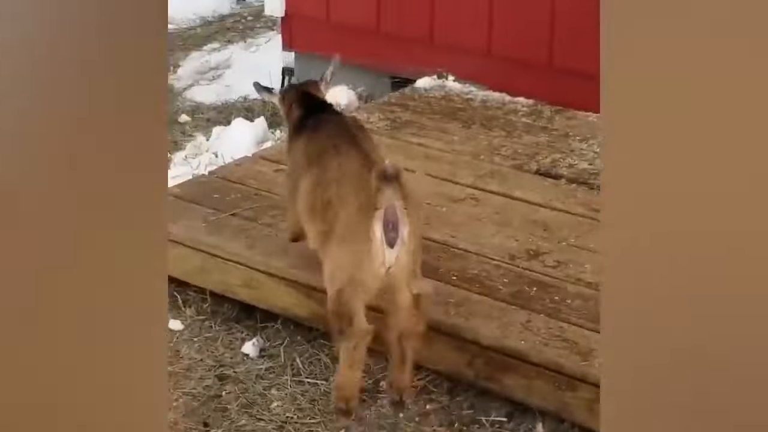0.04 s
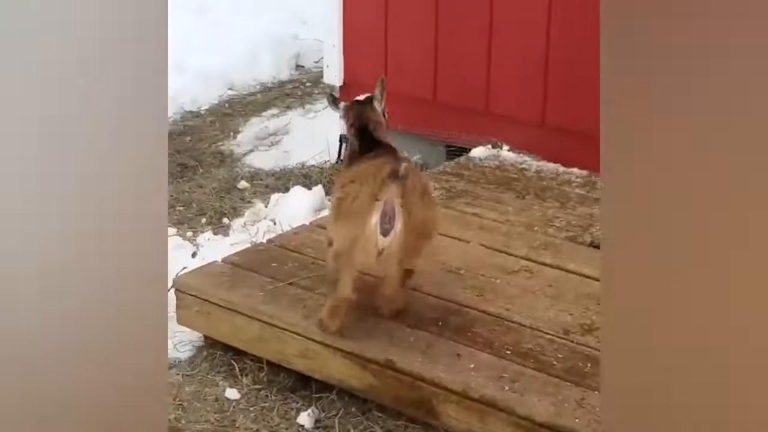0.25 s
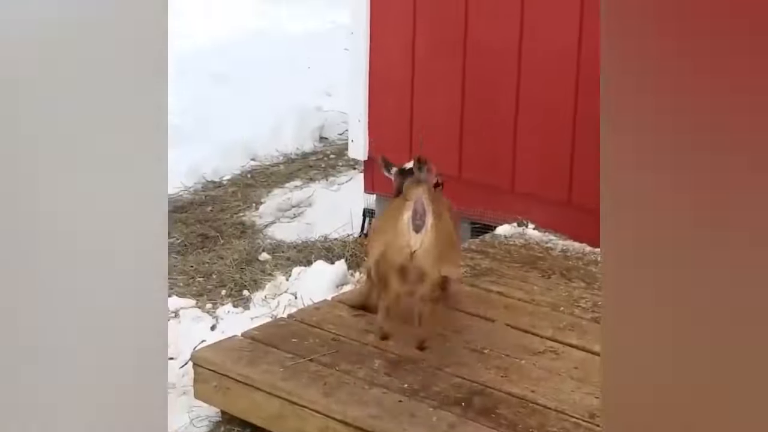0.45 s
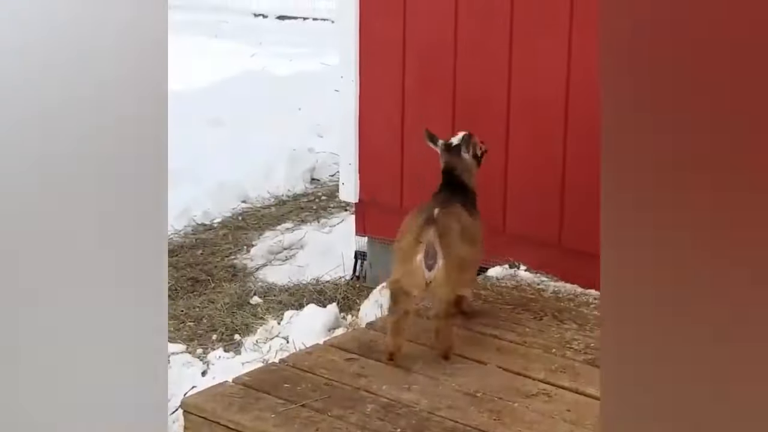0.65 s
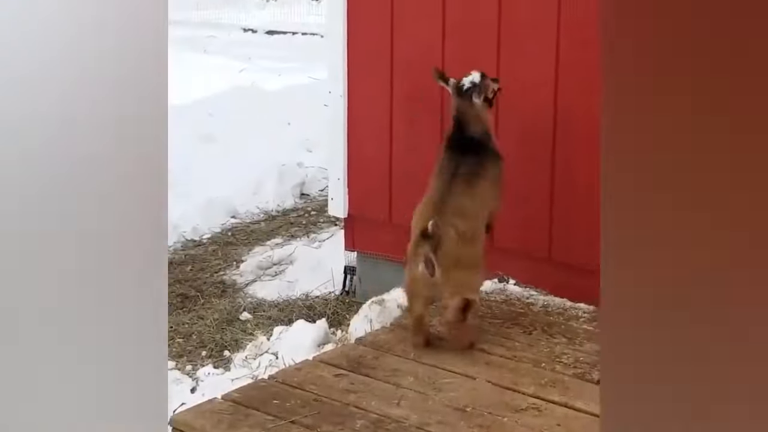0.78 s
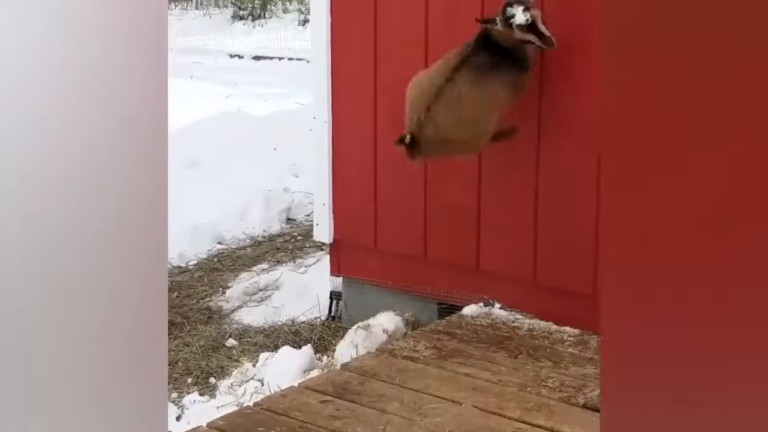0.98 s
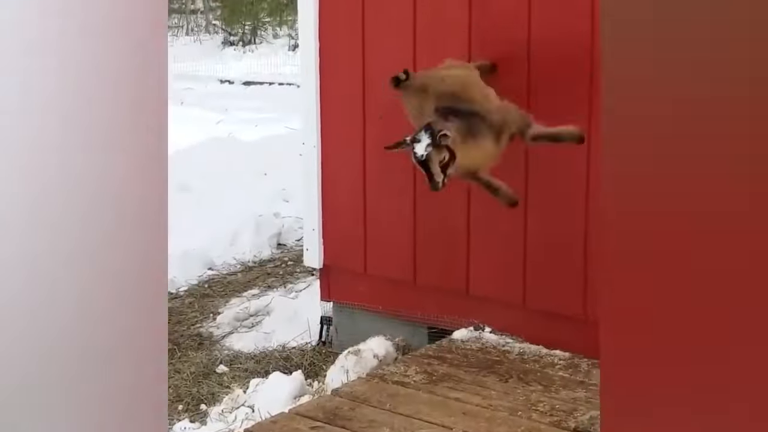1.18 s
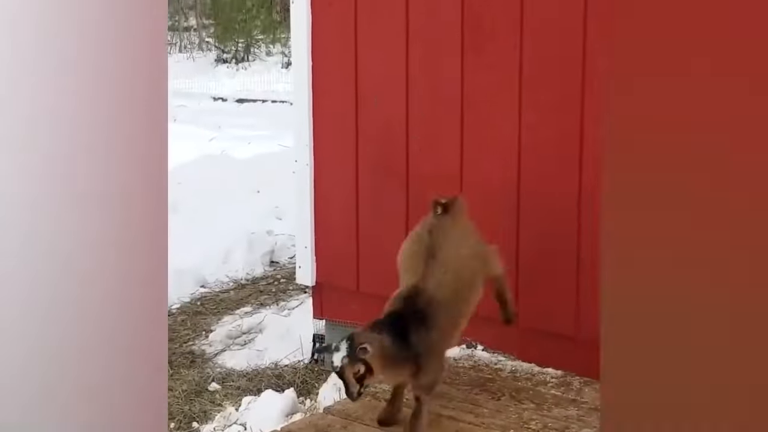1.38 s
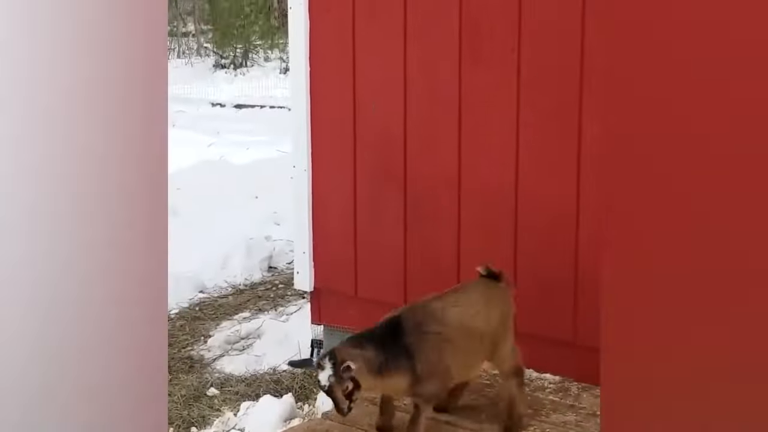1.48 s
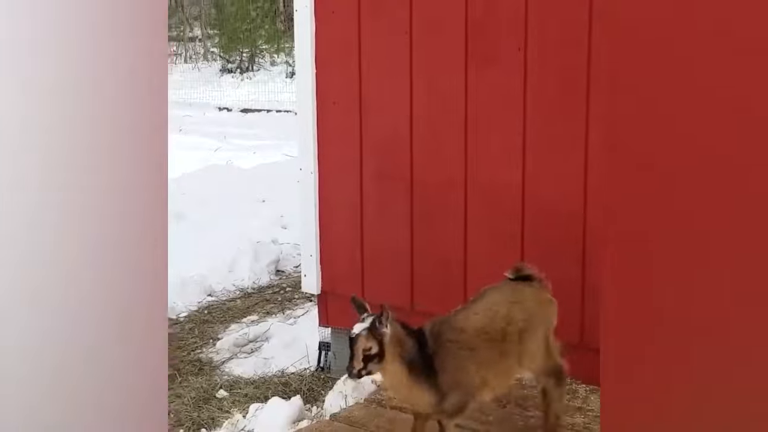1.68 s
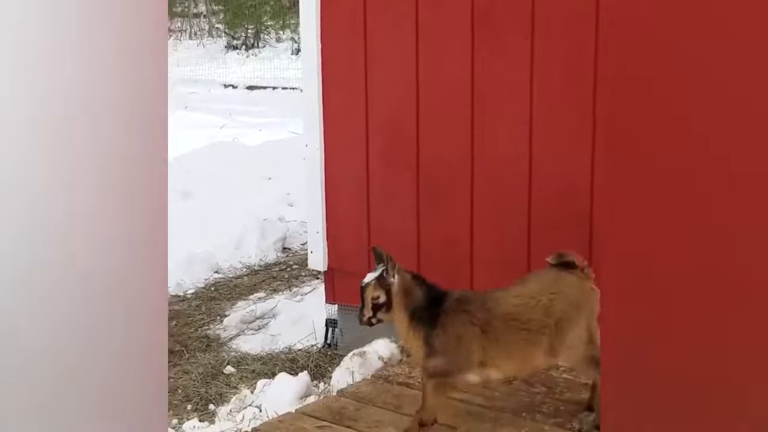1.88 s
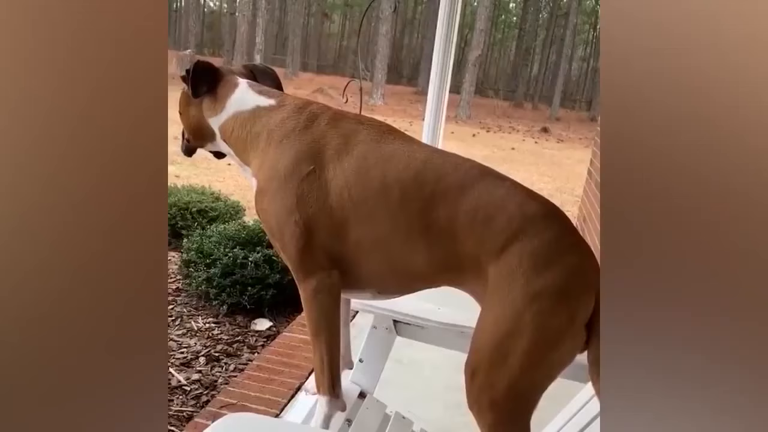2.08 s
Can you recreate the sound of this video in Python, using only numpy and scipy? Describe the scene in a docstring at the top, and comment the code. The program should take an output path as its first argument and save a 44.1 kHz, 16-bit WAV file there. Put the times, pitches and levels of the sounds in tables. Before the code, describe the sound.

Goat kid hooves knock on a wooden deck in quick irregular taps, kick a hollow plank wall with a loud boom and rattle, then land in a hard clatter; close, dry, outdoors with faint hiss.

```python
"""A quiet outdoor hiss, then a goat kid hops onto a wooden deck, kicks off a plank wall and lands again.
The hiss is steady coloured noise; scuffs are trains of tiny grains, and snaps are short noise pulses.
Each hoof layers damped thuds and knocks, noise-band clatter and clack, and the ringing modes of the deck.
The hollow wall is struck the same way but booms for longer, and its loose planks rattle."""
import sys
import numpy as np
from scipy import signal
from scipy.fft import rfft, irfft
from scipy.io import wavfile

SR = 44100
rng = np.random.default_rng(int(sys.argv[2]) if len(sys.argv) > 2 else 0)


def materialize(psi):
    """Save the field psi as 16-bit PCM at rate SR to the path in sys.argv[1].

    A 1-D psi becomes a single channel; in a 2-D psi each row is a channel.
    """
    bounded = np.clip(np.atleast_2d(psi).T, -1, 1)
    quanta = np.round(bounded * 32767).astype(np.int16)
    wavfile.write(sys.argv[1], SR, quanta)


N = 94329  # length in samples

# Outdoor hiss spectrum: (frequency [Hz], relative level per Hz [dB])
AIR_SPECTRUM = [(20, -31.5), (45, -7.5), (90, -4.5), (230, 1), (400, -5.5), (750, -8.5), (1400, -12.5),
                (3000, -14.5), (4400, -9.5), (5600, -25.5), (7000, -23), (8600, -15.5), (11000, -24),
                (13500, -7.5), (16000, -15.5)]
# Spectra of hoof rubbing wood, ground grit and snapping grit: (frequency [Hz], relative level per Hz [dB])
RUB_SPECTRUM = [(25, -46.5), (60, -53), (200, 0), (550, -2.5), (1100, 1), (1700, -13.5), (2600, -16),
                (5000, -32.5), (16000, -50)]
GRIT_SPECTRUM = [(500, -20), (2500, 4), (4200, 8.5), (6000, 2), (8000, 7), (11000, 5), (14000, 12.5),
                 (16000, 11)]
SNAP_SPECTRUM = [(1000, -33), (4000, -13), (7000, -8), (8000, 6.5), (10000, -6), (13000, 7.5), (16000, 1.5)]
# Stereo width of the noise-based sounds: (frequency [Hz], side minus mid [dB])
STEREO_WIDTH = [(100, -15.5), (400, -11.5), (1000, -7), (2200, 0.5), (4500, 0.5), (15000, 1)]
# Scuffs: (time of the peak [s], rise [s], fade [s], rub level [dB], grit level [dB])
SCUFFS = [(0.344, 0.06, 0.068, -50, -58.5), (0.443, 0.021, 0.028, -37.5, -54.5),
          (.503, 0.045, 0.0052, -55.5, -66), (0.604, 0.045, 0.088, -44.5, -51.5),
          (0.737, 0.019, 0.016, -52, -62.5), (0.846, 0.023, 0.064, -48.5, -50),
          (0.931, 0.014, 0.017, -50.5, -60), (1.103, 0.023, 0.04, -30, -43.5),
          (1.263, 0.06, 0.053, -38.5, -60), (1.37, 0.1, 0.2, -61, -59), (1.548, 0.006, 0.025, -38.5, -47),
          (1.646, 0.025, 0.033, -43.5, -50), (1.707, 0.0065, 0.027, -48, -50),
          (1.936, 0.03, 0.016, -38.5, -55)]
# Sharp little snaps of grit: (time [s], level [dB])
GRIT_SNAPS = [(0.864, -40.5), (.955, -48.5), (1.209, -48), (1.2355, -52), (1.55, -39), (1.658, -38.5),
              (1.704, -47), (1.798, -45), (1.854, -45), (1.9534, -35)]
# Loose planks that knock softly as the wall shakes: (time [s], level [dB])
PLANK_RATTLES = [(1.181, -37), (1.277, -22), (1.298, -26.5), (1.367, -35), (1.411, -32.5), (1.466, -36)]
# Hooves on the wall: (time [s], thud pitch [Hz], thud level [dB], knock pitch [Hz], knock level [dB],
#   wood clatter level [dB], clack pitch [Hz], clack level [dB], wall boom level [dB])
WALL_KICKS = [(1.046, 260, -44.5, 746, -55, -41, 1180, -43.5, -55),
              (1.0703, 127, -35.5, 713, -28.5, -35.5, 1170, -35, -32.5),
              (1.0977, 154.8, -26.5, 494, -21, -23.5, 1470, -29.5, -27.5),
              (1.1076, 130, -45, 1019, -28, -25.5, 1270, -34, -33),
              (1.206, 260, -31, 641, -25.5, -31, 1920, -27, -33.5),
              (1.2358, 420, -7.5, 495, -16, -7, 2507, -19.5, -21.5)]
# Hooves on the deck: (time [s], thud pitch [Hz], thud level [dB], knock pitch [Hz], knock level [dB],
#   wood clatter level [dB], clack pitch [Hz], clack level [dB], deck ring level [dB], left minus right [dB])
DECK_HOOVES = [(.080, 239, -40.5, 637, -40.5, -49.5, 1540, -54, -53, -5),
               (0.276, 205.5, -21, 374, -40, -51, 2220, -52.5, -30.5, -2.5),
               (0.319, 233, -21, 1446, -38, -34.5, 2920, -39.5, -41.5, -3),
               (.438, 208, -31, 547, -26, -35, 1410, -30.5, -35.5, -3),
               (0.5674, 402, -25.5, 1810, -35.5, -23.5, 1500, -31.5, -35, -1),
               (.573, 261, -16, 1020, -29.5, -25, 1640, -45, -21.5, -3),
               (0.621, 365, -21, 1073, -34.5, -35, 2240, -37, -25, -3.5),
               (0.698, 277, -23.5, 500, -33.5, -40, 1887, -38.5, -28, -2.5),
               (.732, 250, -27, 537, -31.5, -28.5, 2460, -42.5, -27.5, -2),
               (0.84, 412.6, -14, 1030, -29.5, -21, 960, -31.5, -21.5, -2),
               (0.843, 268, -19.5, 1370, -37.5, -28, 1240, -48.5, -24, -3.5),
               (.912, 375, -14.5, 689, -23.5, -21.5, 2320, -35.5, -25.5, -3),
               (0.9219, 227, -24, 503, -24.5, -31.5, 3900, -49, -38, -2.5),
               (1.543, 272, -15, 744, -28, -17, 1100, -24, -50, -2),
               (1.5457, 369.5, -6, 1082, -19, -8, 2000, -25.5, -17, -1),
               (1.6304, 255, -14, 2188, -24, -16.5, 2335, -25, -51, 0),
               (1.632, 378, -14.5, 1009, -21, -23.5, 930, -26, -45, -3.5),
               (1.646, 211, -18.5, 506, -11, -20.5, 2540, -27.5, -67, -2),
               (1.654, 544, -20, 1042, -21.5, -50, 1290, -33.5, -57, -1.5),
               (1.706, 257, -64, 990, -54, -53, 2190, -41.5, -69, 1),
               (1.795, 241, -52, 910, -48, -41.5, 990, -63.5, -41.5, -2),
               (1.818, 264, -29, 974, -31, -35, 1247, -38, -38.5, -2),
               (1.9015, 557, -19.5, 770, -25.5, -31, 1510, -31.5, -46, -1.5),
               (1.9025, 473, -34, 555, -24.5, -40, 1970, -39, -68, -1.5),
               (2.1059, 905, -28.5, 1060, -31, -51.5, 1240, -34, -67, -3),
               (2.11, 625, -42.5, 2087, -49, -62.5, 1435, -48, -72, 0)]
# Ringing modes of wall and deck, before the shift from spot to spot:
#   (frequency [Hz], relative level [dB], time to fall 60 dB [s])
WALL_MODES = [(118, -18.5, 0.36), (174.3, 1, 0.14), (276.5, -4, 0.72), (319, -8, .25), (419, 3, 0.18),
              (513, -1.5, 0.33), (758, -4, 0.11), (918.6, 9.5, 0.074), (1650, -14.5, 0.08),
              (1884, -20.5, 0.073), (3050, -18, 0.093)]
DECK_MODES = [(214, -1, 0.13), (267.5, 10, 0.039), (355.6, 0.5, 0.14), (503.6, -14.5, 0.25),
              (585, -50, 0.1), (765, -29, 0.043), (974.5, 2.5, 0.041)]
# Crowded modes of the hollow wall:
#   (frequency [Hz], band level [dB], decay [s], tail relative to onset [dB], tail decay [s])
WALL_BOOM = [(34.3, -44, 0.14, -10.5, 0.22), (75.5, -31, 0.03, 3.5, 0.14), (147.5, -7.5, 0.043, -2, 0.1),
             (300, -12.5, 0.021, -14.5, 0.24), (580, 1, 0.024, -16, 0.16), (1010, -27, .035, -12.5, 0.66),
             (1810, -28, 0.024, -10, 0.21), (3930, -19, 0.0033, -11, 0.0325)]
# Crowded modes of struck wood, before the pitch of the spot shifts them:
#   (frequency [Hz], band level [dB], decay [s], tail relative to onset [dB], tail decay [s])
WOOD_CLATTER = [(66.4, -50.5, 0.013, -19, .06), (151, -47, 0.0043, -9.5, 0.039),
                (298, -8.5, 0.0022, 8.5, 0.02), (532, -6.5, 0.013, -8.5, 0.029),
                (1040, -5.5, 0.0049, -53, 0.011), (1510, -21, 0.0043, -25, 0.01),
                (2330, -36, 0.0033, -11.5, 0.024), (5000, -57, .003, -24, 0.024)]
# The hoof's hard clack:
#   (ratio to its pitch [-], band level [dB], decay [s], tail relative to onset [dB], tail decay [s])
HOOF_CLACK = [(.45, -26.5, 0.0045, -18, 0.016), (.72, -11, 0.0045, -8, 0.025),
              (1, 4.5, 0.0064, -19.5, 0.039), (1.25, -13.5, 0.0017, -10, 0.0073),
              (1.6, -17, 0.017, -16.5, 0.052), (2.4, -27, 0.0043, -33.5, 0.04),
              (4, -29.5, 0.0028, -27, 0.027), (7, -31.5, .003, -13, .02)]

AIR_DB = -59.5
GRAIN_SPREAD_DB, GRAINS_PER_S = 1.5, 1200
FLICKER_DB, FLICKER_CLUMP_S = 1.5, 0.0052  # uneven strength of the scuffs
THUD_RISE_S, THUD_DECAY_S = 0.008, 0.0041  # on the deck
KNOCK_RISE_S, KNOCK_DECAY_S = 0.0033, 0.0035  # on the deck
WOOD_RISE_S, DECK_RING_RISE_S = 0.0011, 0.0093  # the wood's rise holds at 1 kHz and is slower in the bass
SPOT_DETUNE = 0.025  # share by which the modes shift from spot to spot
BANDS_HZ = np.geomspace(35, 16000, 25)
BOARD_HZ, PLACE_SHARE = 356, 0.17  # the clatter partly follows the pitch of the spot that is struck
CONTACT_RATIO = 0.77  # the contact time dulls the clatter above this multiple of the clack's pitch
DECK_LOW_HZ, WALL_LOW_HZ = 175, 45.3  # below these the boards hardly radiate
LEFT_LATE_S = 0.00007  # the deck lies a little to the right
CUT_HZ = 16200  # top of the recorder's band


def amp(db):
    """Decibels to gain."""
    return 10 ** (np.asarray(db) / 20)


def unit(x):
    """Scales to rms 1."""
    return x / np.sqrt(np.mean(x ** 2) + 1e-20)


def read(table, hz, axis=1):
    """Reads one column of a table along log frequency."""
    columns = np.transpose(table)
    return np.interp(np.log(hz + 1), np.log(columns[0] + 1), columns[axis])


def add(mix, s, sound):
    """Adds a sound to the stereo mix at time s, cut off at the end of the mix."""
    start = max(round(s * SR), 0)
    part = mix[:, start:][:, :sound.shape[-1]]
    part += sound[..., :part.shape[1]]


def spread(pair):
    """Turns two unrelated signals into left and right spectra, wider in the treble."""
    hz = np.fft.rfftfreq(pair.shape[1], 1 / SR)
    mid, side = rfft(pair)
    width = amp(read(STEREO_WIDTH, hz))
    left_right = np.array([mid + width * side, mid - width * side])
    return hz, left_right / np.sqrt(1 + width ** 2)


def colour(pair, spectrum):
    """Stereo sound of rms 1 with the given spectrum."""
    hz, spectra = spread(pair)
    return unit(irfft(spectra * amp(read(spectrum, hz)), pair.shape[1]))


def swell(t, rise):
    """A soft start from 0 to 1."""
    return (1 - np.exp(-t / rise)) ** 2


def air():
    """The steady outdoor hiss: noise coloured by the air spectrum."""
    return amp(AIR_DB) * colour(rng.standard_normal((2, N)), AIR_SPECTRUM)


def grains(spectrum):
    """A dense train of tiny slips of uneven size, scattered at random in time."""
    sizes = amp(GRAIN_SPREAD_DB * np.minimum(rng.exponential(1, (2, N)), 4))
    sizes = sizes * rng.choice([-1, 1], (2, N))
    slips = rng.random((2, N)) < GRAINS_PER_S / SR
    return colour(sizes * slips, spectrum)


def scuffs():
    """Hooves slide on the wood and grind the grit that lies on it."""
    t, rub, grit = np.arange(N) / SR, np.zeros(N), np.zeros(N)
    for s, rise, fade, rub_db, grit_db in SCUFFS:
        shape = np.exp(-(np.minimum(t - s, 0) / rise) ** 2 - np.maximum(t - s, 0) / fade)
        rub += amp(rub_db) * shape
        grit += amp(grit_db) * shape
    memory = np.exp(-1 / (FLICKER_CLUMP_S * SR))
    clumps = unit(signal.lfilter([1], [1, -memory], rng.standard_normal(N)))
    sliding = rub * grains(RUB_SPECTRUM) + grit * grains(GRIT_SPECTRUM)
    return sliding * amp(FLICKER_DB * clumps)


def snaps(decay=0.0008, size=1024):
    """Single bright snaps: noise under a pulse that peaks after one decay time."""
    out, t = np.zeros((2, N)), np.arange(size) / SR
    pulse = t / decay * np.exp(1 - t / decay)
    for s, db in GRIT_SNAPS:
        noise = colour(rng.standard_normal((2, size)), SNAP_SPECTRUM)
        add(out, s, amp(db) * noise * pulse)
    return out


def blow(hz, rise, decay, size=4096):
    """One heavily damped board mode: a sine under an envelope of peak 1."""
    t = np.arange(size) / SR
    shape = swell(t, rise) * np.exp(-t / decay)
    return shape / shape.max() * np.sin(2 * np.pi * hz * t)


def ring(modes, size, rise=DECK_RING_RISE_S):
    """The lasting modes of a wooden structure, a little different at each spot struck."""
    t = np.arange(size) / SR
    spot = 1 + SPOT_DETUNE * rng.uniform(-1.06, 1)
    total = np.zeros(size)
    for hz, db, t60 in modes:
        total += amp(db - 60 * t / t60) * np.sin(2 * np.pi * (spot * hz * t + rng.random()))
    return swell(t, rise) * total


def burst(table, size=8192, pitch=1, evenness=0.51):
    """Crowded modes: each noise band starts fast, dies quickly, then lingers in a weaker or stronger tail."""
    t, out = np.arange(size) / SR, np.zeros((2, size))
    hz, spectra = spread(rng.standard_normal((2, size)))
    step = np.log(BANDS_HZ[1] / BANDS_HZ[0])
    table = [(row[0] * pitch, *row[1:]) for row in table]
    lowest, highest = table[0][0] / np.sqrt(2), table[-1][0] * np.sqrt(2)
    for centre in BANDS_HZ[(BANDS_HZ > lowest) & (BANDS_HZ < highest)]:
        db, decay, tail_db, tail = (read(table, centre, axis=k) for k in range(1, 5))
        window = np.sqrt(np.maximum(1 - abs(np.log((hz + 1) / centre)) / step, 0))
        band = np.fft.ifft(spectra * window, size)
        band = band.real / np.linalg.norm(band, axis=0) ** min(evenness, 1)  # shallower beats between modes
        rise = WOOD_RISE_S * np.sqrt(1000 / centre)
        shape = swell(t, rise) * (np.exp(-t / decay) + amp(tail_db) * np.exp(-t / tail))
        loudness = np.sqrt(np.mean(shape ** 2)) / shape.max() / 2
        out += amp(db) * unit(band * shape) * loudness
    return out


def clatter(thud_hz, clack_hz):
    """Crowded wood modes, coloured by the spot struck and by the hardness of the contact."""
    corner = min(CONTACT_RATIO * clack_hz, SR / 4)
    dulling = signal.butter(2, corner, fs=SR, output="sos")
    wood = burst(WOOD_CLATTER, pitch=(thud_hz / BOARD_HZ) ** PLACE_SHARE)
    return signal.sosfilt(dulling, wood)


def radiate(x, low_hz, order):
    """Air slips round the boards, so their deepest motion is weakened by a high-pass."""
    return signal.sosfilt(signal.butter(order, low_hz, "highpass", fs=SR, output="sos"), x)


def rattles():
    """Loose planks of the shaking wall knock softly, each as a short wood clatter."""
    out = np.zeros((2, N))
    for s, db in PLANK_RATTLES:
        add(out, s, amp(db) * clatter(thud_hz=517, clack_hz=1500))
    return radiate(out, WALL_LOW_HZ, order=2)


def wall(modes_db=-6, thud_cycles=3):
    """Hooves knock on a plank of the hollow wall and set its crowded and lasting modes booming."""
    out = np.zeros((2, N))
    for s, thud_hz, thud_db, knock_hz, knock_db, wood_db, clack_hz, clack_db, boom_db in WALL_KICKS:
        add(out, s, amp(thud_db) * blow(thud_hz, rise=0.00053, decay=thud_cycles / thud_hz))
        add(out, s, amp(knock_db) * blow(knock_hz, rise=0.00051, decay=0.014))
        add(out, s, amp(wood_db) * clatter(thud_hz, clack_hz))
        add(out, s, amp(clack_db) * burst(HOOF_CLACK, pitch=clack_hz))
        modes = amp(modes_db) * ring(WALL_MODES, size=32768, rise=0.0036)
        add(out, s, amp(boom_db) * (burst(WALL_BOOM, size=32768) + modes))
    return radiate(out, WALL_LOW_HZ, order=2)


def hooves():
    """Each hoof drives the board under it, clacks with its hard edge and rings the deck."""
    out, t = np.zeros((2, N)), np.arange(N) / SR
    for s, thud_hz, thud_db, knock_hz, knock_db, wood_db, clack_hz, clack_db, ring_db, pan_db in DECK_HOOVES:
        sides = amp([[pan_db / 2], [-pan_db / 2]])
        add(out, s, sides * amp(thud_db) * blow(thud_hz, THUD_RISE_S, THUD_DECAY_S))
        add(out, s, sides * amp(knock_db) * blow(knock_hz, KNOCK_RISE_S, KNOCK_DECAY_S))
        add(out, s, sides * amp(wood_db) * clatter(thud_hz, clack_hz))
        add(out, s, sides * amp(ring_db) * ring(DECK_MODES, size=8192))
        add(out, s, sides * amp(clack_db) * burst(HOOF_CLACK, pitch=clack_hz))
    out[0] = np.interp(t - LEFT_LATE_S, t, out[0])
    return radiate(out, DECK_LOW_HZ, order=3)


def scene():
    """The goat on deck and wall, over still outdoor air."""
    return air() + scuffs() + snaps() + rattles() + wall() + hooves()


def record(dry):
    """The recorder's band limit: a steep low-pass."""
    lowpass = signal.firwin(255, CUT_HZ, window=("kaiser", 9), fs=SR)
    return signal.oaconvolve(dry, lowpass[None], "same")


dry = scene()
out = record(dry)
materialize(out)
```